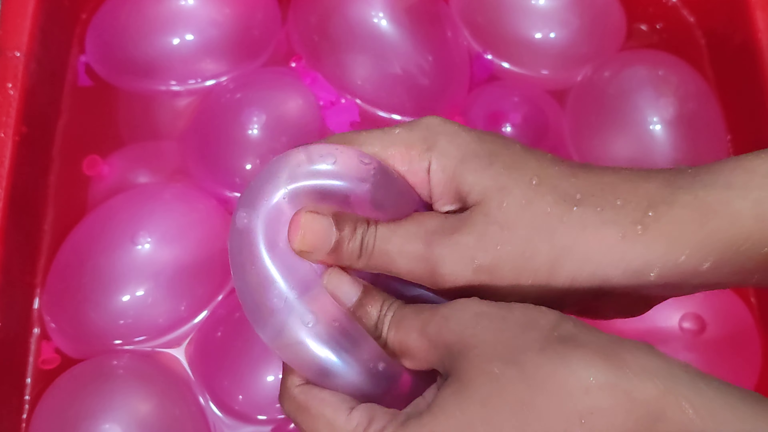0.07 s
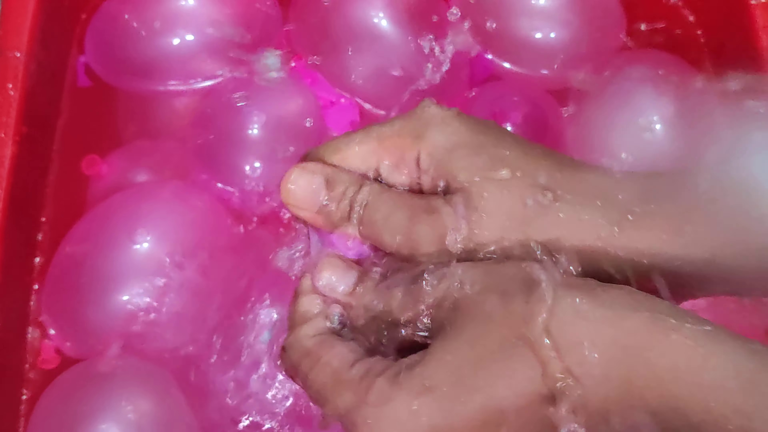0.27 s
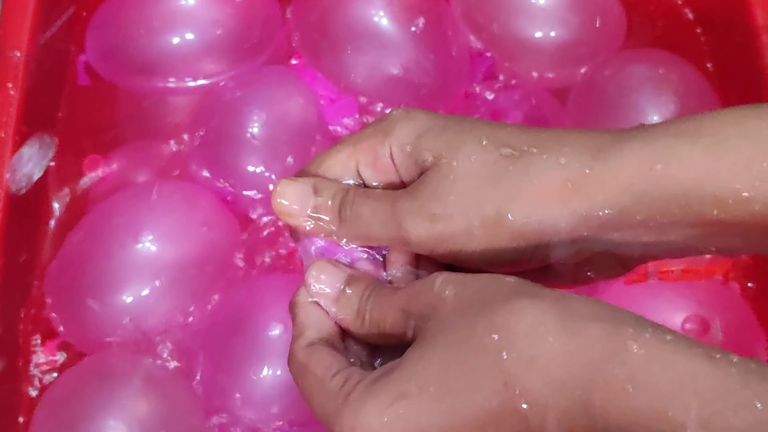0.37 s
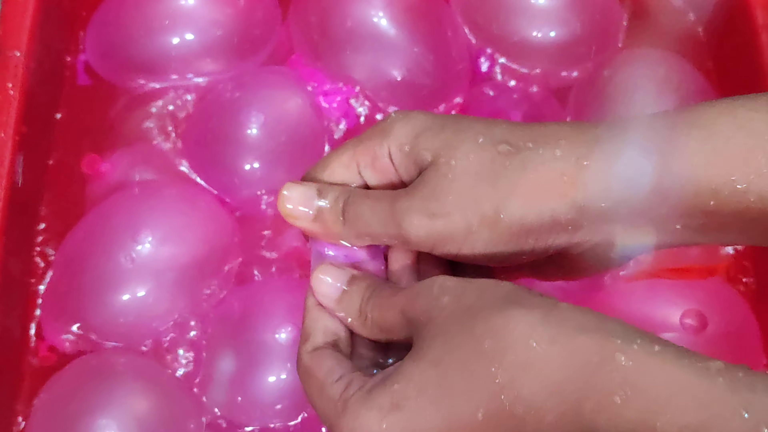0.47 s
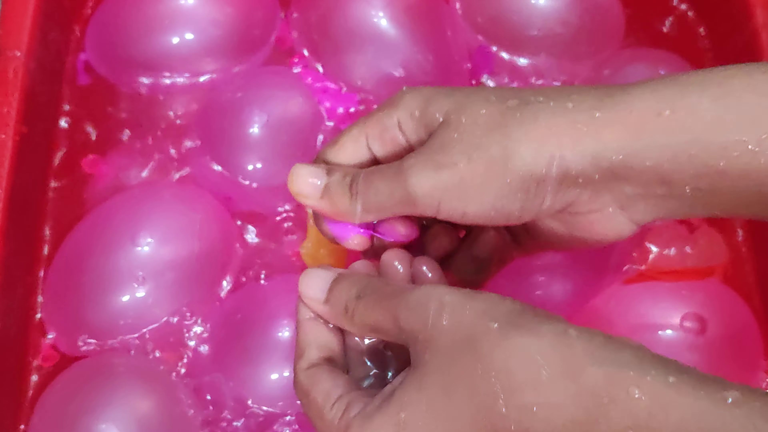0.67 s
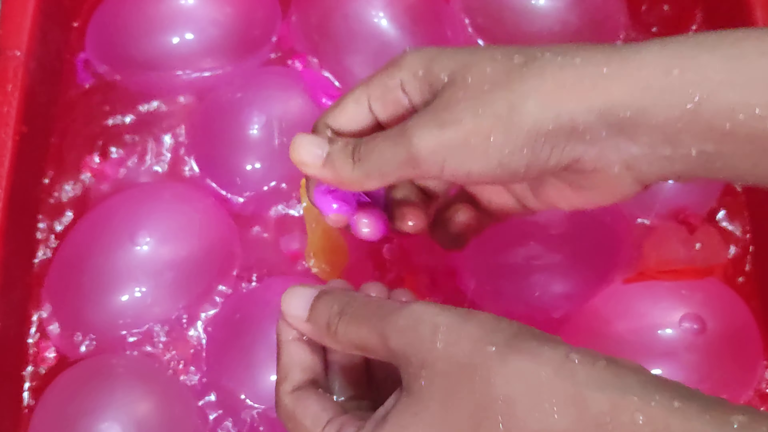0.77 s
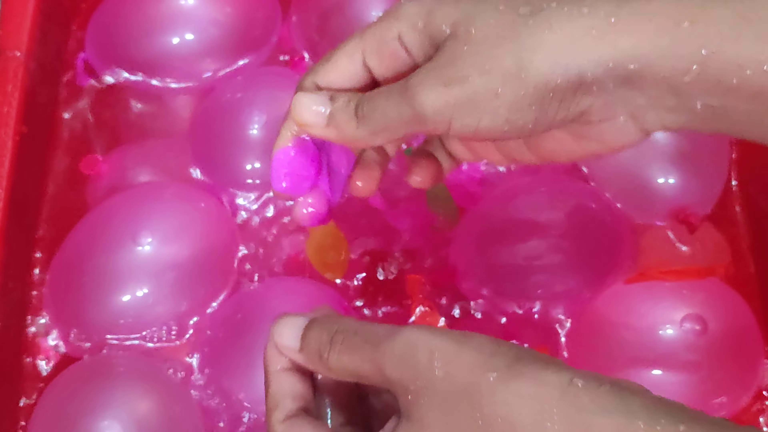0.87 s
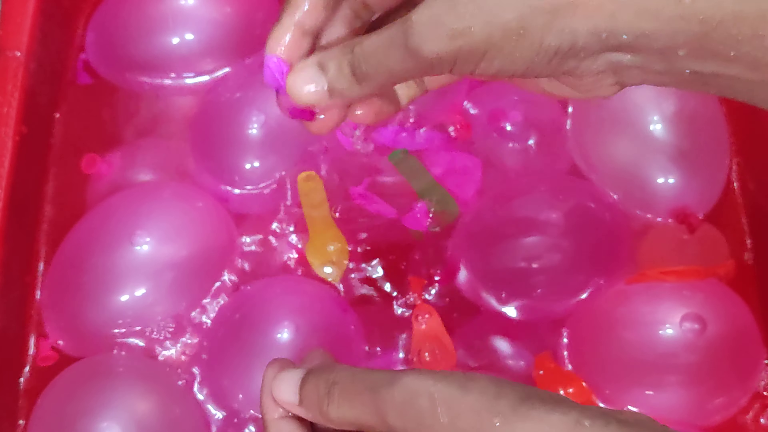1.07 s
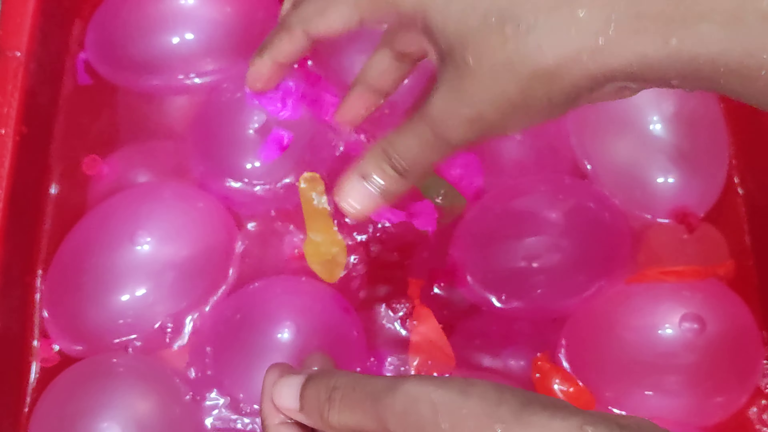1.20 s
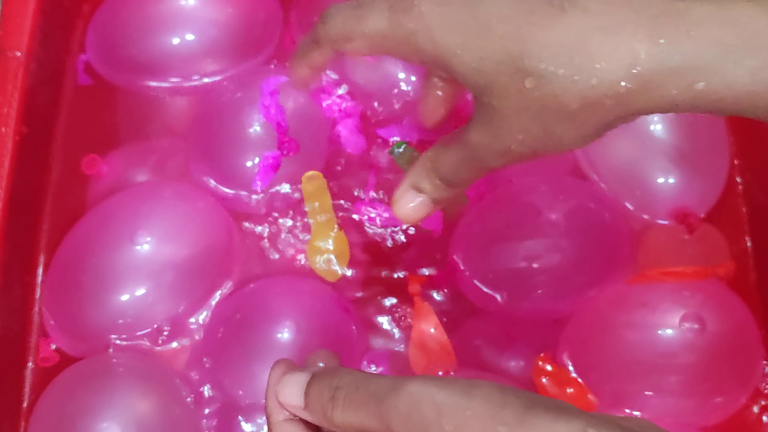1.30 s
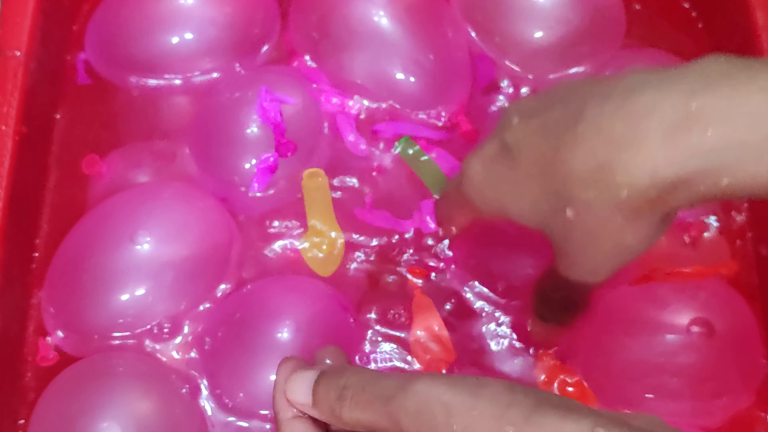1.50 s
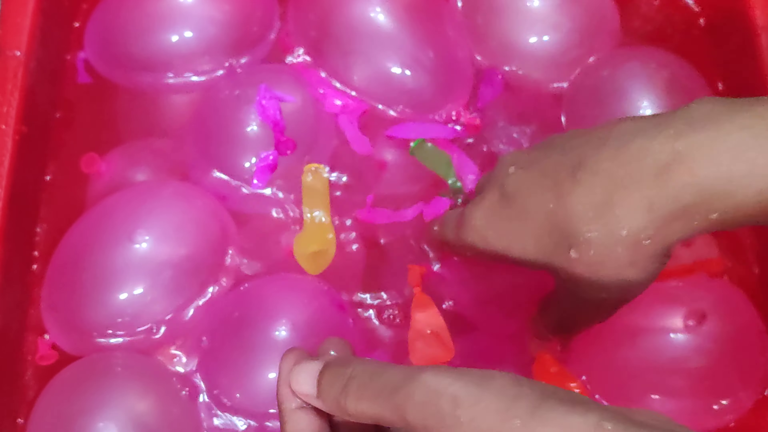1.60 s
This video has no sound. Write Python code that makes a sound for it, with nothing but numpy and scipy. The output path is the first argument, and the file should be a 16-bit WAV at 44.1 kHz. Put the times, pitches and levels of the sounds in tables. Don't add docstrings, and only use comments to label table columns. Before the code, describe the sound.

A water balloon bursts in the hands with a sharp snap and low gust thump, spray hisses, water slaps and gurgles in a plastic tub of balloons, then drips patter; close stereo microphone, quiet room.

```python
import sys
import numpy as np
from scipy import signal
from scipy.fft import rfft, irfft, next_fast_len
from scipy.io import wavfile
from scipy.ndimage import uniform_filter1d

SR = 44100
rng = np.random.default_rng(int(sys.argv[2]) if len(sys.argv) > 2 else 0)


def voltage_ratio(decibels):
    exponent = np.asarray(decibels, float) / 20
    return 10 ** exponent


def put_to_file(sound):
    columns = np.atleast_2d(sound).T
    safe = np.clip(columns, -1, 1)
    whole_steps = np.round(safe * 32767)
    wavfile.write(sys.argv[1], SR, whole_steps.astype(np.int16))


N = 72765

SNAP_S = 0.2189
DROP_SPREAD_DB = 3


def evened(x):
    return x / np.sqrt(np.mean(x ** 2) + 1e-20)


def read(points, hz):
    f, value = np.transpose(points)
    return np.interp(np.log(hz + 1), np.log(f + 1), value)


def add(mix, s, sound):
    part = mix[:, round(s * SR):][:, :sound.shape[1]]
    part += sound[:, :part.shape[1]]


def colour(x, db_at):
    size = next_fast_len(x.shape[1] + 2048)
    gain = voltage_ratio(db_at(np.fft.rfftfreq(size, 1 / SR)))
    return irfft(rfft(x, size) * gain, size)[:, :x.shape[1]]


def pair(x, same):
    same = np.clip(same, 0, 1)
    return np.array([x[0], same * x[0] + np.sqrt(1 - same ** 2) * x[1]])


def resonate(x, hz, width):
    turn = np.exp(2j * np.pi * hz * np.arange(x.shape[1]) / SR)
    r = np.exp(-np.pi * width / SR)
    return 2 * (turn * signal.lfilter([1 - r], [1, -r], x / turn)).real


def patchy(x):
    z = signal.stft(x, nperseg=256, noverlap=192)[2]
    field = uniform_filter1d(rng.standard_normal(z.shape[1:]), size=4, axis=0)
    field = uniform_filter1d(field, size=14, axis=1)
    patch_db = 3.5 * evened(field)
    return signal.istft(z * voltage_ratio(patch_db), nperseg=256, noverlap=192)[1][:, :x.shape[1]]


def burst():
    # start in seconds, left level in dB, right level in dB.
    cracks = [(0.2199, -12, -23), (0.22, -17, -10.5), (0.2224, -12, -20), (.2283, -11.5, -25),
              (.2312, -8, -28), (0.2342, -25, -31), (0.2363, -37, -14), (0.241, -32, -35)]
    # time in seconds, level in dB.
    spray = [
        (.219, -15),
        (0.237, -24.5),
        (.27, -30.5),
        (0.303, -37.5),
        (.345, -32),
        (.385, -33),
        (.47, -42.5),
        (0.598, -52),
        (0.748, -44.5),
    ]
    # frequency in Hz, gain in dB.
    spray_hue = [(150, -30), (500, -18), (1700, -9.5), (4600, -14.5), (7400, -10.5), (9300, -14.5),
                 (12700, -5.5), (16000, -4.5)]
    snap_db, snap_long_s = -11, 0.00038
    rebound_s, rebound_db = 0.00251, 2
    crack_t60 = 0.005

    out, t = np.zeros((2, N)), np.arange(800) / SR
    snap = np.minimum(t * 15000, 1) * np.exp(-(t / snap_long_s) ** 2)
    add(out, SNAP_S, np.outer([1, .2], voltage_ratio(snap_db) * snap))
    blurred = uniform_filter1d(np.roll(snap, 9), size=15)
    add(out, SNAP_S + rebound_s, np.outer([1, .3], voltage_ratio(snap_db + rebound_db) * blurred))

    for s, left_db, right_db in cracks:
        noise = colour(rng.standard_normal((2, 800)), lambda hz: 1.08 * read(spray_hue, hz))
        crack = evened(noise) * voltage_ratio(-60 * t / crack_t60)
        add(out, s, crack * voltage_ratio(np.array([[left_db], [right_db]])))

    at, db = np.transpose(spray)
    t = np.arange(N) / SR
    level = voltage_ratio(np.interp(t, at, db) - 60 * np.maximum(t - at[-1], 0)) * (t > at[0])
    hiss = colour(droplets(N), lambda hz: read(spray_hue, hz))
    return out + evened(patchy(hiss)) * level


def droplets(count):
    drops_per_s, mist, fizz_db = 3400, 0.87, -9
    hit, big = rng.random(count), rng.exponential(1, count)
    impacts = (hit < drops_per_s / SR) * voltage_ratio(DROP_SPREAD_DB * np.minimum(big, 4))
    puffs = signal.lfilter([1], [1, -.95], impacts)
    water = pair(rng.standard_normal((2, count)), 0.12) * (mist + evened(puffs))
    return evened(water) + voltage_ratio(fizz_db) * fizz(count)


def fizz(count):
    bubbles_per_s, decay_cycles = 2500, 9
    hit, kind, big, side = rng.random((4, count))
    out = np.zeros((2, count))
    hit = (hit < bubbles_per_s / SR) * voltage_ratio(-DROP_SPREAD_DB * np.log(big + 0.031))
    sides = np.array([side, 1 - side])
    for k, hz in enumerate(np.geomspace(700, 15500, num=14)):
        u = np.arange(1200) * hz / SR
        ring = np.sin(2 * np.pi * u * (1 + 0.0026 * u))
        ring = ring * np.minimum(u / 2, 1) * np.exp(-u / decay_cycles) * hz
        chosen = hit * ((kind * 14).astype(int) == k)
        out += signal.oaconvolve(chosen * sides, ring[None])[:, :count]
    return evened(out)


def shoves():
    # start in seconds, left push, right push (full scale 1), rise in seconds, let-go in seconds.
    pushes = [
        (0.2194, -0.57, -0.15, 0.00098, 0.041),
        (0.3264, 0.2, 0.0044, 0.002, 0.23),
        (0.3491, 0.041, 0.088, 0.002, 0.078),
        (.371, -0.024, 0.038, 0.0036, 0.055),
        (0.398, -0.042, -0.041, 0.048, 0.26),
    ]
    out, t = np.zeros((2, N)), np.arange(SR) / SR
    for s, left, right, rise, go in pushes:
        step = 1 - np.exp(-(t / rise) ** 2)
        let_go = (1 - t / go) * np.exp(-t / go)
        add(out, s, np.outer([left, right], step * let_go))
    return out


def band(hz, spread):
    # frequency in Hz, gain in dB.
    port_hue = [(300, 28.5), (1000, 3.5), (6500, -1.5), (9000, -6.5), (11500, -0.5), (14500, -1),
                (16000, 1.5)]
    return lambda f: read(port_hue, f) - np.minimum(6 * (np.log2((f + 1) / hz) / spread) ** 2, 45)


def splash(db, hz, spread, t60):
    slap_db, slap_t60, rise_s = -2, 0.03, 0.002
    t = np.arange(13230) / SR
    decay = voltage_ratio(-60 * t / t60) + voltage_ratio(slap_db - 60 * t / slap_t60)
    shape = np.minimum(t / rise_s, 1) * decay
    return voltage_ratio(db) * shape * evened(patchy(colour(droplets(len(t)), band(hz, spread))))


def tick(db, hz, spread):
    t = np.arange(900) / SR
    puff = evened(colour(pair(rng.standard_normal((2, 900)), 0.062), band(hz, spread)))
    return voltage_ratio(db - 60 * t / .016) * np.minimum(t / .0005, 1) * puff


def bubble(db, hz, t60, glide):
    swell = 0.067
    t = np.arange(6000) / SR
    turn = rng.random() + np.array([[0], [.22]])
    shape = voltage_ratio(db - 60 * t / t60) * np.minimum(t / (swell * t60), 1)
    return shape * np.sin(2 * np.pi * (hz * t * (1 + glide * t / 2) + turn))


def pocket(length, db, hz, width):
    gulps_per_s, fade_db = 200, -13.5
    t = np.arange(13230) / SR
    hit, size = rng.random(len(t)), rng.standard_normal((2, len(t)))
    gulps = ((hit < gulps_per_s / SR) + 0.076) * pair(size, 0.16)
    ring = evened(resonate(resonate(gulps, hz, width), hz, 7.9 * width))
    fade = fade_db * t / length - 250 * np.maximum(t - length, 0)
    return ring * np.minimum(t / 0.0025, 1) * voltage_ratio(db + fade)


def room(x):
    room_t60, room_db = 0.3, -8
    at = np.arange(200, 22000, 20) + rng.integers(0, 20, (2, 1090))
    taps = np.zeros((2, 22050))
    np.put_along_axis(taps, at, rng.choice([-1., 1.], at.shape) * voltage_ratio(-60 * at / SR / room_t60), 1)
    taps /= np.linalg.norm(taps[0])
    return voltage_ratio(room_db) * signal.fftconvolve(x, taps, axes=1)[:, :N]


def air():
    # frequency in Hz, level in dB.
    air_hue = [(18, -46), (30, -3.5), (103, -2), (183, -9.5), (220, -10.5), (402, -12), (612, -16),
               (698, -17.5), (15800, -40)]
    # frequency in Hz, gain in dB.
    air_lift = [(3000, 2), (9000, 3.5), (12500, 10), (16000, 11)]
    # frequency in Hz, left-right likeness from 0 to 1.
    air_same = [(60, 0.85), (380, 0.31), (2380, 0.047), (15000, 0.018)]
    air_db, hum_db, hum_hz, hum_width = -59, -67, 97.7, 4.8
    hush_db, hush_hz = -4.5, 3250

    frames, hz = N // 256 + 5, np.fft.rfftfreq(1024, 1 / SR)
    a, b, c, d, patches = rng.standard_normal((frames, 513, 5)).T
    patches = evened(uniform_filter1d(uniform_filter1d(patches, 10, 0), 10, 1))
    same = np.clip(read(air_same, hz), -1, 1)[:, None]
    left = a + 1j * b
    z = np.array([left, same * left + np.sqrt(1 - same ** 2) * (c + 1j * d)])
    tone_db = (read(air_hue, hz) + read(air_lift, hz))[:, None]
    z *= voltage_ratio(tone_db + 2.4 * patches) * (hz > 1)[:, None]

    before_burst = np.arange(frames) * 256 / SR < SNAP_S
    hush = hush_db * np.outer(hz / (hz + hush_hz), before_burst)
    open_air, hushed_air = [signal.istft(v, nperseg=1024, noverlap=768)[1][:, :N] for v in (z, z * voltage_ratio(hush))]
    hum = evened(resonate(pair(rng.standard_normal((2, N)), 0.87), hum_hz, hum_width))
    return voltage_ratio(air_db) * hushed_air / np.std(open_air) + voltage_ratio(hum_db) * resonate(hum, hum_hz, 40)


def scene():
    # start in seconds, level in dB, centre in Hz, spread in octaves, T60 in seconds.
    splashes = [(.327, -40.5, 2320, 1.3, 0.4), (.356, -37, 1640, 1.22, 0.18),
                (.371, -36, 2770, 1.273, 0.92), (.481, -43.5, 2000, 0.62, 0.14),
                (.49, -44.5, 6900, 0.41, 0.26), (0.5603, -42, 5760, 0.42, .3),
                (.617, -43, 7060, 0.85, 0.54), (.65, -67, 8700, 0.82, 0.37), (.705, -48, 11000, 1.2, 0.15),
                (.7296, -40.5, 9600, 1, 0.39), (.74, -47, 5930, 1.13, 1), (.763, -44, 8250, 0.39, 0.3),
                (.818, -41.5, 5460, 0.34, 0.38), (.82, -46.5, 10200, 0.35, 0.51),
                (.85, -55, 7802, 0.83, 0.24), (.908, -47.5, 2830, 1.34, 0.38),
                (.919, -42, 7900, 1.37, 0.47), (.972, -44.5, 12900, 0.33, 0.15),
                (1.17, -56.5, 12400, 0.97, 0.3), (1.2316, -55.5, 8450, 1.23, 0.74),
                (1.309, -61, 13100, 0.51, 0.5), (1.6, -63.5, 13380, 0.39, 0.17),
                (1.606, -59.5, 1870, 0.57, 0.23)]
    # start in seconds, level in dB, centre in Hz, spread in octaves.
    ticks = [(.359, -36, 2500, 1.5), (.495, -38, 6500, .4), (.618, -40, 9000, .5), (.7300, -31, 11500, .6),
             (.7640, -35, 10000, 1.2), (.8180, -37, 7500, .8), (.9064, -36, 1900, .9),
             (.9066, -39, 13500, .5), (.9755, -39, 13500, .4), (.9218, -36, 9000, 1.1),
             (1.0392, -38, 13000, 1.6), (1.2315, -44, 9000, 1.2), (1.288, -59, 9000, .4),
             (1.309, -41, 12500, .5), (1.331, -55, 11000, .6), (1.357, -56, 14500, .3)]
    # start in seconds, level in dB, pitch in Hz,
    # T60 in seconds, pitch gain per second.
    bubbles = [(.2192, -15, 2200, 0.0084, 6), (.2188, -17, 5170, 0.01, -6), (.241, -35, 1720, 0.029, 0),
               (.255, -41, 1740, .03, -10), (.265, -33, 1700, .03, -5), (.369, -22.5, 1005, 0.049, 2.5),
               (.370, -24.5, 1915, 0.024, 9.5), (.367, -34, 2496, 0.092, 40), (.389, -27, 1005, 0.05, 5.5),
               (.397, -24.5, 1036, 0.075, 1), (.399, -38, 3940, 0.017, 11), (.407, -40, 2070, 0.023, -4),
               (.420, -32, 1038, 0.065, 1.5), (.428, -28.5, 1037, 0.057, 1), (.435, -33, 3540, .025, 4),
               (.443, -38, 1040, 0.048, -5), (.456, -32, 1064, .06, -3), (.480, -28, 1418, 0.07, 2),
               (.482, -33, 1834, .04, 1), (.486, -36, 2520, .04, -2), (.488, -33, 901, 0.041, -4),
               (.495, -34, 1590, .04, -1), (.496, -36, 2620, 0.031, 1.5), (.498, -37.5, 1032, 0.047, -8),
               (.505, -43, 1460, 0.035, 2), (.516, -29.5, 1490, 0.034, -3), (.519, -33, 1680, 0.027, -7.5),
               (.523, -37, 960, 0.073, -2.5), (.537, -34.5, 1282, 0.042, -1), (.549, -41, 1500, 0.032, -4),
               (.54, -42.5, 963, .09, 0.5), (.578, -42, 1778, .07, -2), (.594, -39, 1707, 0.054, -2.5),
               (.583, -48, 1024, 0.058, -10.5), (.615, -42, 2290, 0.036, -10.5), (.84, -51, 756, .15, 0)]
    # start in seconds, level in dB, pitch in Hz,
    # T60 in seconds, pitch gain per second.
    drips = [(.9058, -28, 4160, 0.014, 15), (.9065, -37, 5570, .008, -4), (1.2318, -40.5, 3940, .022, 2),
             (1.233, -45, 3650, 0.022, 4), (1.237, -47, 4350, .02, 0), (1.241, -48, 3060, 0.027, 2),
             (1.247, -45, 3800, 0.019, -8), (1.248, -55, 4620, .02, 4), (1.255, -43.5, 3520, .025, 17),
             (1.265, -46, 3840, 0.018, 0), (1.270, -46, 3920, .02, -1), (1.288, -50, 3780, .025, 0),
             (1.300, -64, 3850, .02, -3), (1.314, -57, 5200, .02, 7), (1.324, -63, 3800, 0.026, 6),
             (1.325, -58, 3150, 0.029, 3), (1.336, -55, 3800, 0.022, 2), (1.352, -59, 3900, 0.017, 0),
             (1.362, -58, 3800, 0.022, 4), (1.390, -56.5, 4500, .025, 0), (1.606, -56, 2400, .025, -2),
             (1.607, -59, 1270, .04, -3), (1.617, -57, 1670, 0.028, 4), (1.629, -58, 1620, .025, -6)]
    # start in seconds, length in seconds, level in dB, pitch in Hz, width in Hz.
    pockets = [
        (0.44, 0.12, -51, 1600, 360),
        (.49, 0.14, -48.5, 960, 88),
        (0.27, 0.2, -46, 2240, 830),
        (.56, 0.13, -56.5, 1140, 380),
        (1.24, 0.09, -62, 3750, 520),
    ]
    tub = np.zeros((2, N))
    layers = ((splashes, splash), (ticks, tick), (bubbles, bubble), (drips, bubble), (pockets, pocket))
    for table, source in layers:
        for s, *row in table:
            add(tub, s, source(*row))
    pan_db = np.array([[-0.25], [0.25]])
    water = burst() + tub * voltage_ratio(pan_db)
    return water + room(water) + air() + shoves()


def roll_off(x):
    return signal.sosfilt(signal.butter(12, 17030, fs=SR, output="sos"), x)


def record(dry):
    low_pass = signal.firwin(255, 15900, window=("kaiser", 8), fs=SR)
    mix = signal.oaconvolve(dry, low_pass[None], "same")
    return roll_off(mix)


dry = scene()
out = record(dry)
put_to_file(out)
```